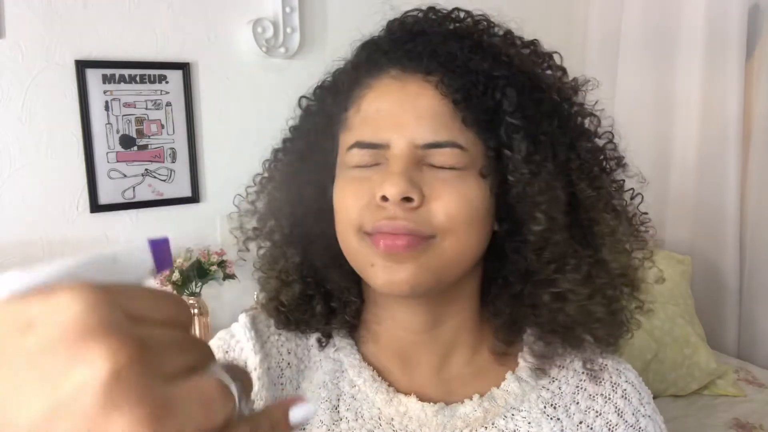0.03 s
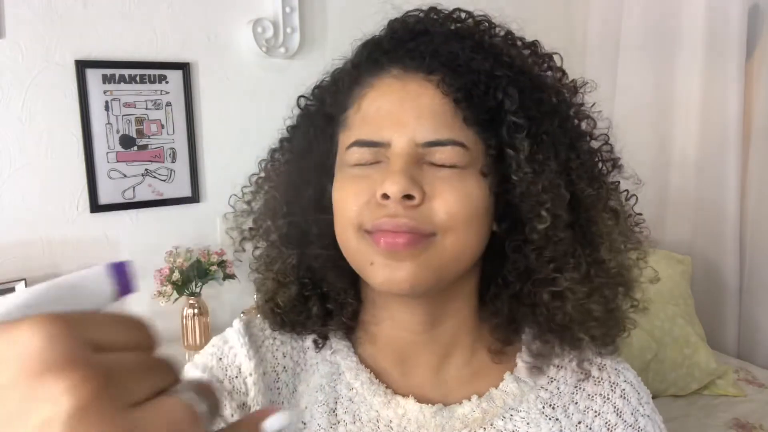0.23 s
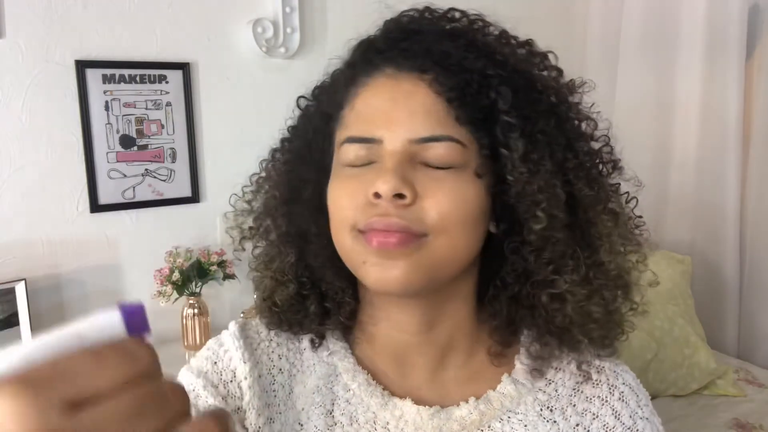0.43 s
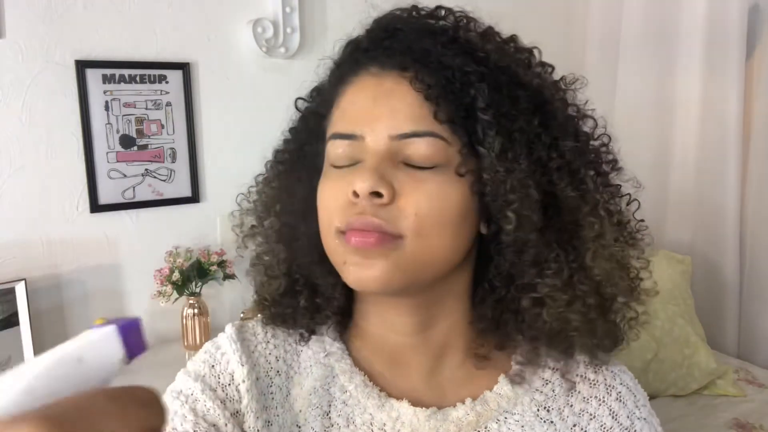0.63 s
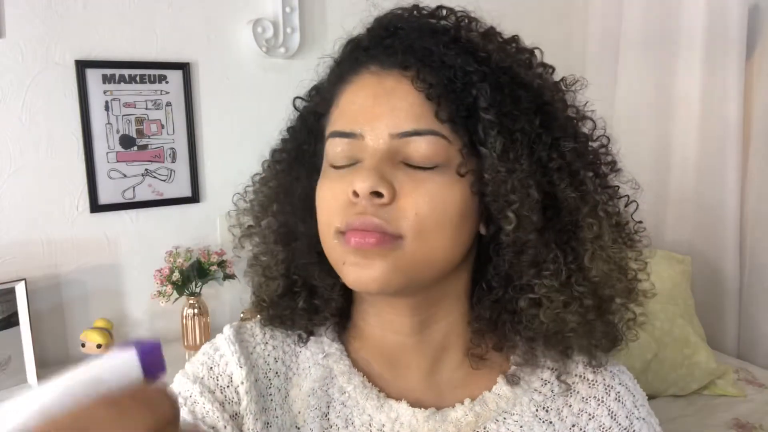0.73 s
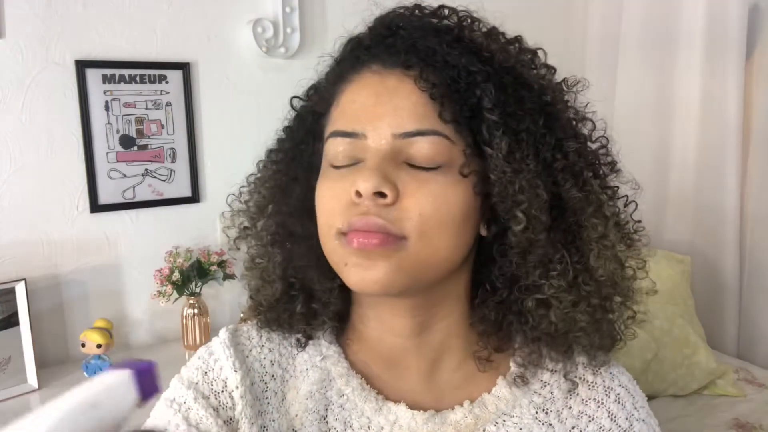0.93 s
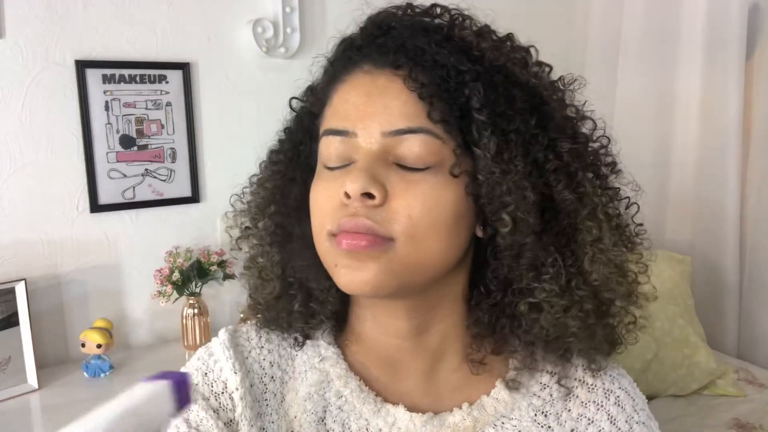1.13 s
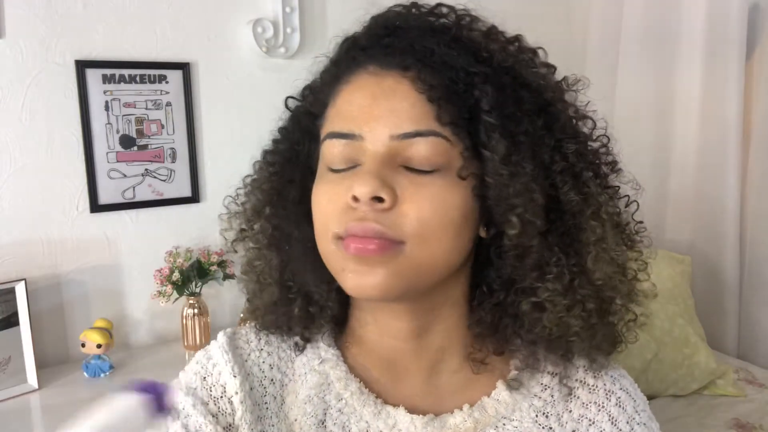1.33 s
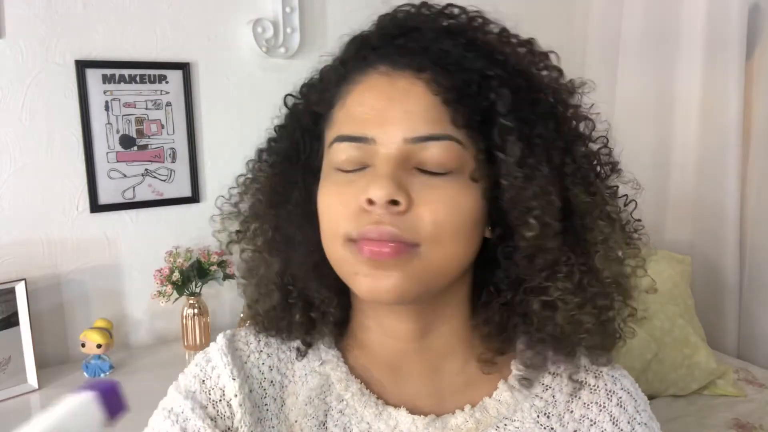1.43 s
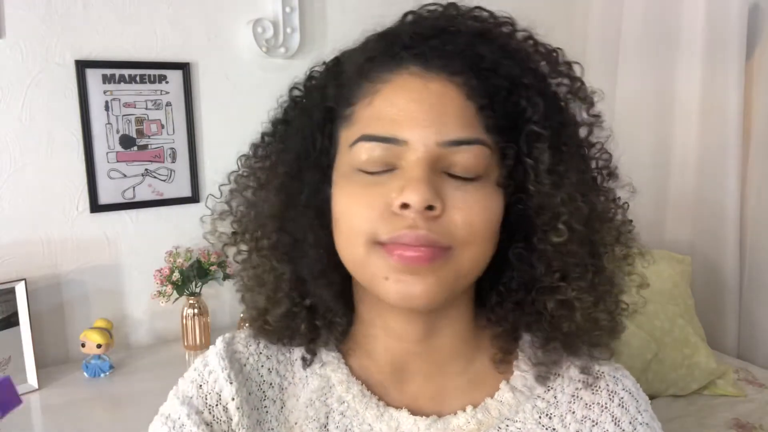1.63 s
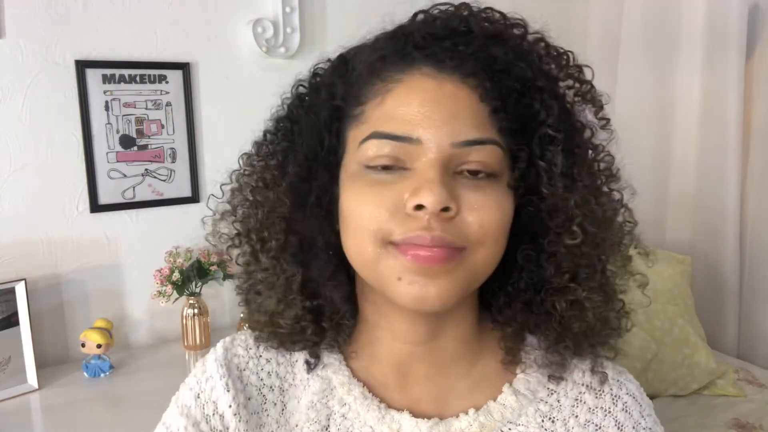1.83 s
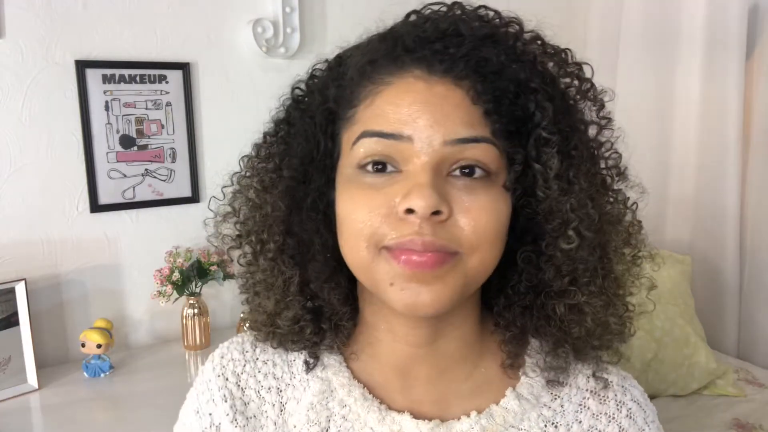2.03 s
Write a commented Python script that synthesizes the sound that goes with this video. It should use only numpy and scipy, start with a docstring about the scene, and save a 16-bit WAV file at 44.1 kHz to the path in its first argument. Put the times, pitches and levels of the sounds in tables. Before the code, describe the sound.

A plastic trigger sprayer pumped rapidly up close, clicking and hissing out short bursts of water

```python
"""A plastic trigger sprayer is pumped quickly close to the microphone in a small furnished room.
Each jet is grainy, sputtering noise; the piston's rub is gritty noise that swells and fades.
Ticks are slip noise ringing the plastic trigger; knocks ring the hollow bottle and its spring.
Short hollow pops, a noise room tail, a low room rumble and wavering room tones complete it."""
import sys
import numpy as np
from scipy import signal
from scipy.fft import rfft, irfft
from scipy.io import wavfile
from scipy.ndimage import uniform_filter1d

SR = 44100
rng = np.random.default_rng(int(sys.argv[2]) if len(sys.argv) > 2 else 0)


def digitize_waveform(pressure):
    """Quantize a signal to 16-bit integers and store it at the path in sys.argv[1].

    Rows of a 2-D input are taken as channels; values are limited to [-1, 1].
    """
    field = np.atleast_2d(pressure).T
    bounded = np.clip(field, -1, 1)
    quanta = np.round(bounded * 32767).astype(np.int16)
    wavfile.write(sys.argv[1], SR, quanta)


N = 92521
EVENT_SAMPLES = 8192  # buffer for one jet, rub, knock or pop


def amp(db):
    """Turns decibels into an amplitude factor."""
    return 10 ** (np.asarray(db) / 20)


def evened(x):
    """Scales a sound to an RMS of one."""
    return x / np.sqrt(np.mean(x ** 2) + 1e-20)


def read(points, hz):
    """Reads a curve of (frequency, value) points along a logarithmic frequency axis."""
    point_hz, value = np.transpose(points)
    return np.interp(np.log(hz + 1), np.log(point_hz + 1), value)


def add(mix, s, sound):
    """Lays a sound into the mix at s seconds, cut off at the end of the mix."""
    part = mix[round(s * SR):][:len(sound)]
    part += sound[:len(part)]


def colour(x, points, tilt_db):
    """Filters by a spectrum tilted around 4 kHz, in dB per octave."""
    hz = np.fft.rfftfreq(len(x), 1 / SR)
    gain_db = read(points, hz) + tilt_db * np.log2(hz / 4000 + .05)
    return irfft(rfft(x) * amp(gain_db), len(x))


def grit(count, grain_db):
    """Noise whose samples have uneven sizes, like droplets or slips."""
    boost = np.minimum(rng.exponential(1, count), 4)
    return rng.standard_normal(count) * amp(grain_db * boost)


def wander(count, size):
    """Smoothed noise with an RMS of one, for level flicker; size is in samples."""
    return evened(uniform_filter1d(rng.standard_normal(count), size=size))


def patchy(x, patch_db):
    """Random patches of louder and softer sound over time and frequency."""
    z = signal.stft(x, nperseg=128)[2]
    field = uniform_filter1d(rng.standard_normal(z.shape), size=3, axis=0)
    field = uniform_filter1d(field, size=4, axis=1)
    return signal.istft(z * amp(patch_db * evened(field)), nperseg=128)[1][:len(x)]


def ring(hz, t60):
    """A resonance as a sine that dies by 60 dB in t60 seconds."""
    t = np.arange(EVENT_SAMPLES) / SR
    return np.sin(2 * np.pi * hz * t) * amp(-60 * t / t60)


def soft(hz, t60, rise):
    """A mode that swells in over the length of a soft blow, rise seconds."""
    t = np.arange(EVENT_SAMPLES) / SR
    return ring(hz, t60) * (1 - np.exp(-(t / rise) ** 2))


def jet(level_db, hold, fall, tilt_db):
    """Spray: quick rise, hold, fall and a weaker fizzing tail; it sputters."""
    # spray spectrum: (frequency [Hz], relative level [dB])
    jet_spectrum = [(240, -50), (400, -19), (1990, -10.5), (2630, -6.5), (3570, -6), (4490, -5.5),
                    (7440, -5), (9950, -12.5), (11400, -8.5), (15500, -9.5)]
    rise_s, tail_s, tail_db = 0.00067, 0.04, -16.5
    grain_db, patch_db, sputter_db = .8, 2.8, 1.0
    low_hz, low_fill_s = 2800, .009
    t = np.arange(EVENT_SAMPLES) / SR
    after = np.maximum(t - hold, 0)
    decay = np.exp(-after / fall) + amp(tail_db) * np.exp(-after / tail_s)
    shape = np.minimum(t / rise_s, 1) * decay
    sputter = wander(len(t), 60)
    spray = patchy(colour(grit(len(t), grain_db), jet_spectrum, tilt_db), patch_db)
    # the low end of the spray fills in late
    low = signal.sosfiltfilt(signal.butter(2, low_hz, fs=SR, output="sos"), spray)
    spray = spray - low * np.exp(-(t / low_fill_s) ** 2)
    return amp(level_db + sputter_db * sputter) * shape * evened(spray)


def rub(length, level_db, tilt_db, peak):
    """Gritty friction of the piston in its cylinder swells and fades with the stroke."""
    # friction spectrum: (frequency [Hz], relative level [dB])
    rub_spectrum = [(180, -41), (300, -28.5), (456, -6.5), (682, -0.5), (1500, 3.5), (1830, 2), (2610, 2.5),
                    (5740, -2.5), (11400, -8.5), (15200, -11.5), (16500, -18)]
    grain_db, flicker_db, patch_db = 1.8, 1.5, 3
    noise = grit(EVENT_SAMPLES, grain_db)
    flicker = wander(EVENT_SAMPLES, 90)
    progress = np.minimum(np.arange(EVENT_SAMPLES) / SR / length, 1)
    # bend the stroke so that the half sine tops out at the peak's place
    bend = np.log(.5) / np.log(np.clip(peak, .05, .9))
    swell = np.sin(np.pi * progress ** bend) ** 1.33
    friction = evened(patchy(colour(noise, rub_spectrum, tilt_db), patch_db))
    return amp(level_db + flicker_db * flicker) * swell * friction


def tick(level_db, tilt_db, length):
    """A short slip rings the broad resonances of the plastic trigger, each swelling in softly."""
    # trigger resonances: (frequency [Hz], width [Hz], relative level [dB])
    trigger = [(1730, 1100, -12), (2540, 490, 3), (3220, 880, 7), (4600, 600, 0), (6160, 690, 1),
               (7940, 5100, 9.5), (10300, 3700, -8), (11100, 6400, -0.5), (14700, 2400, -11)]
    t = np.arange(1024) / SR
    slip = rng.standard_normal(len(t)) * np.exp(-t / max(length, 1e-4))
    slip[0] = 4.2  # first impulse, standing over the slip noise
    body = np.zeros(300)
    for hz, width, db in trigger:
        gain = amp(db + tilt_db * np.log2(hz / 4000)) * width ** 1.5
        body += gain * t[:300] * ring(hz, 1.4 / width)[:300]
    out = np.convolve(slip, body)
    # scale by the loudest 40-sample stretch
    return amp(level_db) * out / np.sqrt(uniform_filter1d(out ** 2, size=40).max() * 2)


def knock(bottle_db, *spring_db):
    """A soft blow on the bottle's modes; the spring's tones flutter as it rattles."""
    # bottle modes: (frequency [Hz], relative level [dB], 60 dB decay [s])
    bottle = [(440, 0, .07), (970, -9, .04), (1570, -13, .03), (2040, -13, .03)]
    # spring tones: (frequency [Hz], 60 dB decay [s])
    spring = [(3420, .07), (4370, .09), (5290, .11)]
    knock_s, rattle_s, rattle_db = .003, .004, 1.8
    out = sum(amp(bottle_db + db) * soft(hz, t60, knock_s) for hz, db, t60 in bottle)
    for db, (hz, t60) in zip(spring_db, spring):
        flutter = wander(EVENT_SAMPLES, 200)
        out = out + amp(db + rattle_db * flutter) * soft(hz, t60, rattle_s)
    return out


def pop(level_db, hz):
    """A short hollow pop: one quickly damped mode with a soft start."""
    return amp(level_db) * soft(hz, t60=.018, rise=0.00044)


def room(x):
    """A noise tail whose bands die at their own speed."""
    # room decay: (frequency [Hz], 60 dB decay [s])
    room_t60 = [(300, .22), (1500, .2), (4000, .2), (12000, .14)]
    hz, t, z = signal.stft(rng.standard_normal(SR // 2), SR, nperseg=256)
    decay = amp(-60 * t / read(room_t60, hz)[:, None])
    tail = signal.istft(z * decay, SR, nperseg=256)[1]
    tail = np.append(np.zeros(200), tail)  # a short gap before the tail
    return signal.fftconvolve(x, tail / np.linalg.norm(tail))[:N]


def floor():
    """Steady room noise over a low rumble whose level drifts."""
    # room noise spectrum: (frequency [Hz], relative level [dB])
    floor_spectrum = [(18, -47), (30, -24), (58, -8), (112, -6.5), (196, -4), (261, -19), (298, -15.5),
                      (399, -21.5), (713, -26.5), (792, -22), (928, -33.5), (9480, -45), (13000, -39),
                      (16500, -53)]
    # level of the bass: (time [s], level [dB])
    rumble = [(0.0, -69.5), (1.01, -67.5), (1.05, -62), (1.6, -61.5), (1.64, -65.5), (2.0, -61.5),
              (2.1, -65)]
    noise = amp(-55.5) * evened(colour(rng.standard_normal(N), floor_spectrum, 0))
    low = signal.sosfiltfilt(signal.butter(4, 280, fs=SR, output="sos"), noise)
    rumble_db = np.interp(np.arange(N) / SR, *np.transpose(rumble))
    return noise - low + evened(low) * amp(rumble_db)


def hum():
    """Wavering room tones, made as narrow bands of noise."""
    # room tones: (frequency [Hz], width [Hz], level [dB])
    tones = [(56.7, 2.7, -79), (226, 8.3, -75.5)]
    hz = np.fft.rfftfreq(N, 1 / SR)
    out = np.zeros(N)
    for centre, width, db in tones:
        band = 1 / (1 + ((hz - centre) / width * 2) ** 2)
        out += amp(db) * evened(irfft(rfft(rng.standard_normal(N)) * band, N))
    return out


def scene():
    """All events of the sprayer, their room tail and the background."""
    # spray jets: (time [s], level [dB], hold [s], fall time constant [s], tilt [dB per octave])
    jets = [(.2445, -29.5, 0.012, 0.011, 1.06), (.4825, -27, 0.012, 0.0028, 1.1),
            (.5243, -36.5, 0.0081, 0.0017, -3), (.7672, -28.5, 0.019, 0.0097, 2.74),
            (.9665, -29.5, 0.0063, 0.0016, -1.6), (1.0045, -28, 0.009, 0.011, 1.66),
            (1.0552, -37, 0.0068, 0.0037, -4.5), (1.2175, -35.5, 0.0041, 0.0025, -3),
            (1.299, -25, 0.0065, 0.0017, 6), (1.308, -29, 0.014, 0.0093, 1.4),
            (1.546, -25, 0.0076, 0.007, 2.5)]
    # piston rubs: (time [s], length [s], level [dB], tilt [dB per octave], place of the peak [0-1])
    rubs = [(0, 0.069, -58, -0.8, 0.09), (.034, 0.087, -44, 0.5, 0), (.108, 0.026, -57, -2, 0.57),
            (.13, 0.18, -45.5, 2.8, 0.15), (.305, 0.057, -47, 0, 0.29), (.383, 0.076, -51.5, -2.7, 0.08),
            (.415, 0.086, -44.5, 1.8, 0.44), (.588, 0.046, -42.5, -2.5, 0.63),
            (.666, 0.081, -47.5, 0.5, 0.09), (.715, 0.089, -46, 3, 0.14), (.865, 0.024, -49.5, 1, 0.02),
            (.88, 0.053, -44, -2, 0.14), (.945, 0.033, -47.5, .1, 0), (1.138, 0.078, -43.5, 0, 0.39),
            (1.222, .025, -51, 8, 0.42), (1.24, 0.08, -46.5, 1.8, 0.52), (1.393, 0.026, -47.5, 2, 0.16),
            (1.41, 0.055, -43.5, 2.1, 0.15), (1.465, 0.049, -52, -1, 0.06), (1.49, 0.2, -49, 2, 0.13),
            (1.635, .1, -50, -1.5, 0.14)]
    # trigger ticks: (time [s], level [dB], tilt [dB per octave], slip time constant [s])
    ticks = [(.0315, -27.5, -2.4, 0.0011), (.1045, -36, -3.5, 0.0044), (.3005, -33.5, -3.5, 0.0045),
             (.3075, -53, 13, 0.0014), (.387, -37.5, 7, 0.006), (.395, -42, -3, .001),
             (.574, -41, -16, 0.0014), (.5865, -29, -3.5, 0.0024), (.5955, -30, -4, 0.0025),
             (.6695, -40.5, -4, 0.00092), (.675, -43, -12, .0008), (.683, -28, 6, 0.0022),
             (.695, -34, 20, 0.00056), (.711, -37, -6, 0.00071), (.7232, -41, 9, 0.00039),
             (.729, -30, 7, 0.00077), (.740, -52, 9, 0.00043), (.8515, -36.5, -13, 0.0028),
             (.8635, -27, -8.5, 0.001), (.870, -56, 9, 0.00089), (.8945, -31.5, -8.5, 0.0021),
             (.940, -41, -9, 0.0014), (.9468, -34, -5, 0.0016), (.954, -38, -11, 0.0011),
             (1.1243, -40.5, -6.5, 0.0036), (1.131, -53, 31, 0.0015), (1.1363, -27, 27, 0.0027),
             (1.173, -31.5, 0, 0.0026), (1.227, -32, -5, 0.0014), (1.2455, -36, -5, 0.0023),
             (1.255, -40, -15, 0.0015), (1.289, -51, 6, 0.00083), (1.289, -26.5, 17, 0.00083),
             (1.377, -40.5, -7, 0.003), (1.3912, -27, 14, 0.0016), (1.400, -56, 1, .0015),
             (1.415, -35, -1.5, 0.0013), (1.4265, -46, 8, 0.0009), (1.4635, -28, -3, .0012),
             (1.4945, -40, -24, 0.0034), (1.6155, -45, -15, .0012), (1.6318, -30.5, -5.5, 0.0011),
             (1.641, -36, -1, 0.006), (1.693, -43.5, -37, 0.0016), (1.708, -54.5, 15, 0.004)]
    # end-stop knocks: (time [s], bottle level [dB], level of each of three spring tones [dB])
    knocks = [(.045, -48.5, -50, -81, -75), (.16, -49.5, -75, -91, -56), (.302, -49.5, -75, -69, -75),
              (.321, -51, -39, -51, -76), (.612, -42, -46, -46, -44), (.73, -50.5, -79, -75, -75),
              (.868, -46, -79, -75, -68), (.895, -42.5, -60, -78, -49), (1.003, -47, -77.5, -77, -73),
              (1.14, -41, -59, -75, -69), (1.172, -50, -60, -73, -44), (1.268, -44.5, -89, -73, -63),
              (1.515, -48.5, -76, -79, -76), (1.645, -52, -44, -80, -81), (1.70, -54, -82.5, -75, -85)]
    # short hollow pops: (time [s], level [dB], frequency [Hz])
    pops = [(.262, -44, 1070), (0.528, -37.5, 1096), (.531, -41.5, 1090), (1.426, -38, 1300),
            (2.003, -41.5, 1375), (2.013, -44.5, 1340)]
    sprayer = np.zeros(N)
    for table, source in ((jets, jet), (rubs, rub), (ticks, tick), (knocks, knock), (pops, pop)):
        for s, *row in table:
            add(sprayer, s, source(*row))
    room_db = -15
    return (sprayer + amp(room_db) * room(sprayer) + floor() + hum())[None]


def record(dry):
    """Microphone colour, then the band limit."""
    # microphone response: (frequency [Hz], gain [dB])
    mic = [(30, -4), (50, -0.5), (7000, 0.24), (8600, 0.5), (9300, -3.5), (10500, -4), (12000, -4.7)]
    edge_hz = 15900
    miked = colour(dry[0], mic, 0)[None]
    lowpass = signal.firwin(511, edge_hz, window=("kaiser", 9), fs=SR)
    return signal.oaconvolve(miked, lowpass[None], "same")


dry = scene()
out = record(dry)
digitize_waveform(out)
```